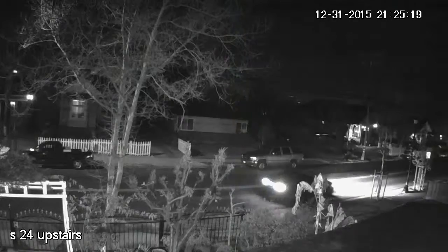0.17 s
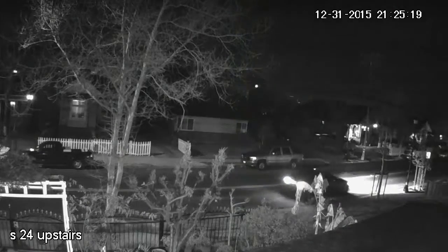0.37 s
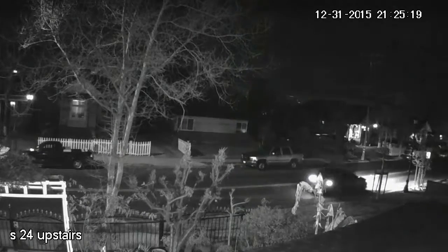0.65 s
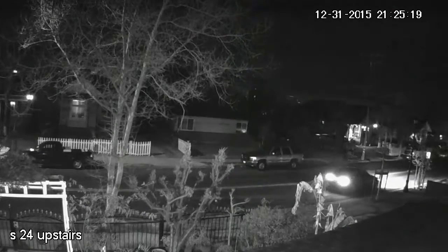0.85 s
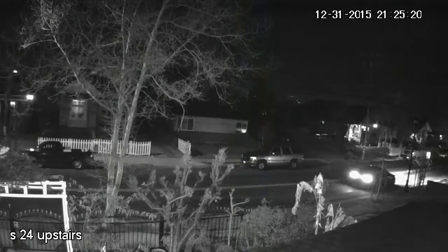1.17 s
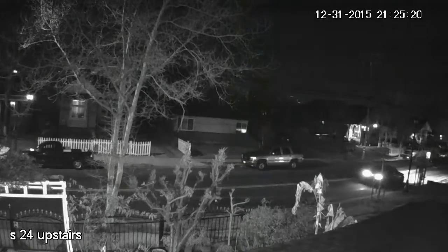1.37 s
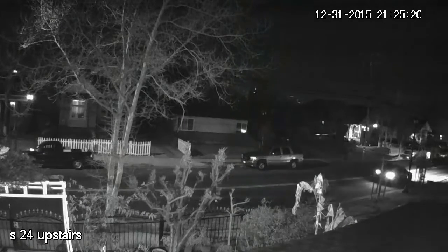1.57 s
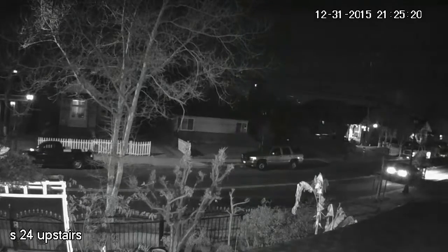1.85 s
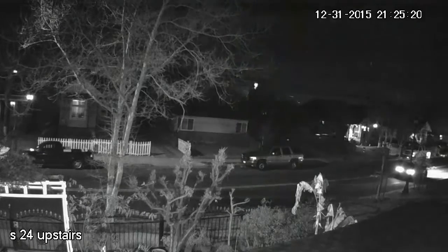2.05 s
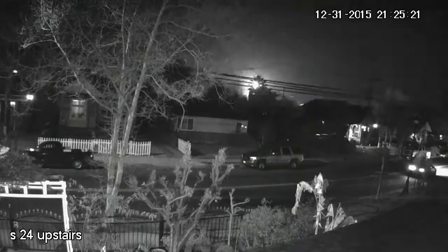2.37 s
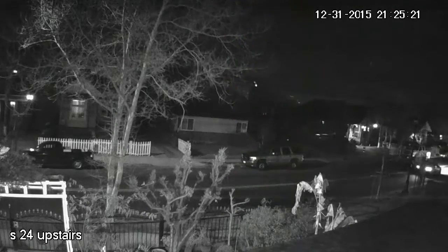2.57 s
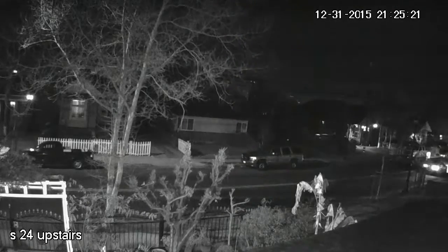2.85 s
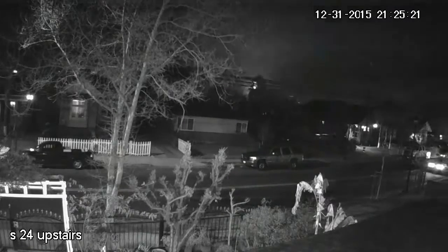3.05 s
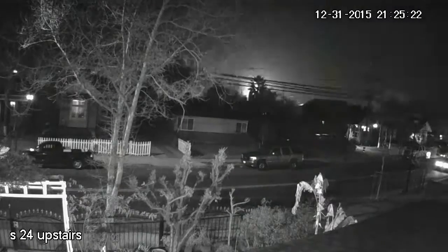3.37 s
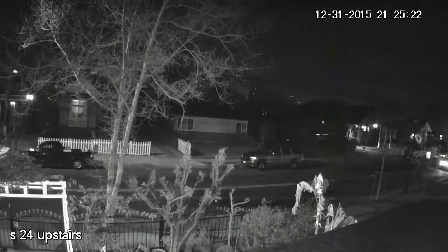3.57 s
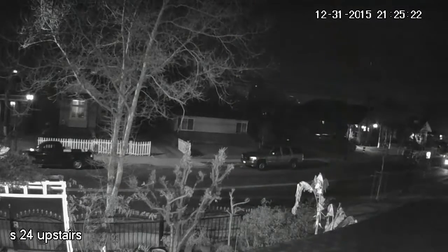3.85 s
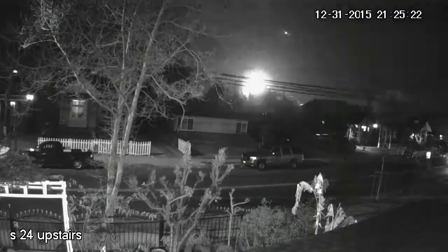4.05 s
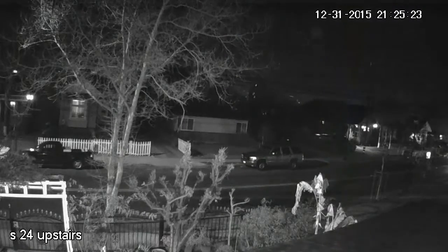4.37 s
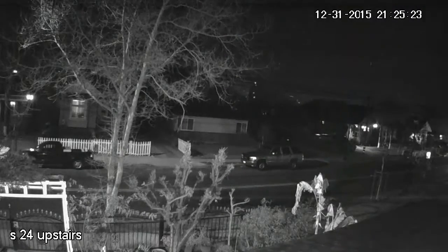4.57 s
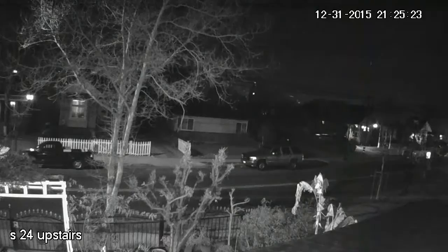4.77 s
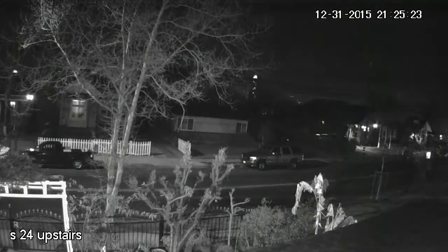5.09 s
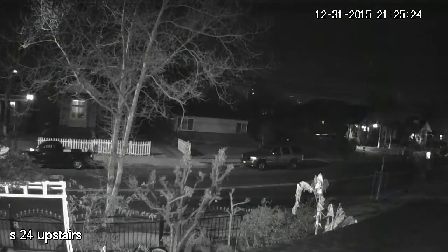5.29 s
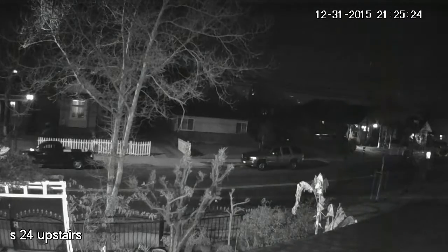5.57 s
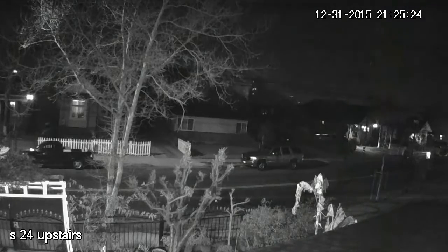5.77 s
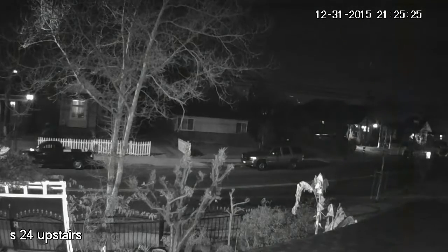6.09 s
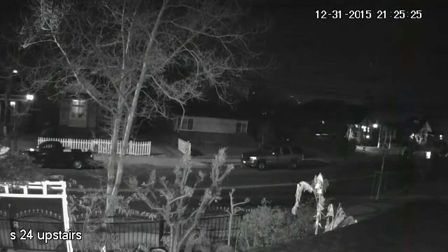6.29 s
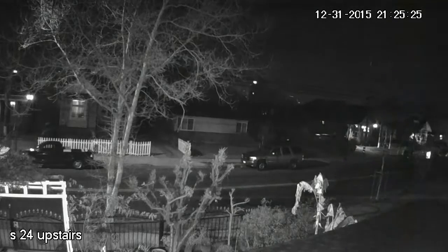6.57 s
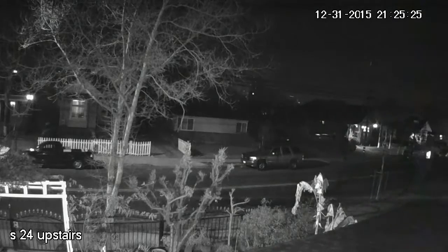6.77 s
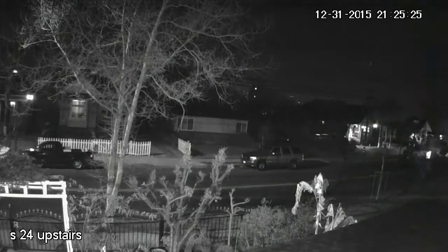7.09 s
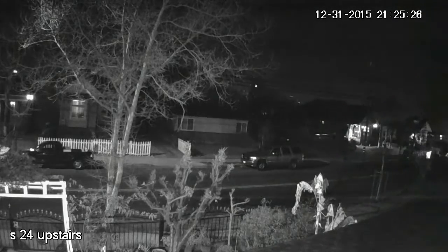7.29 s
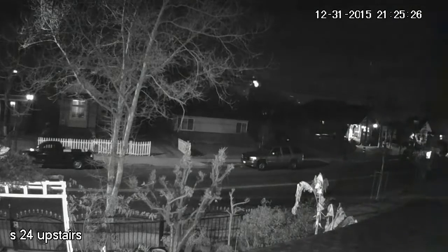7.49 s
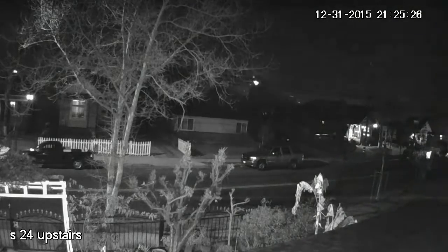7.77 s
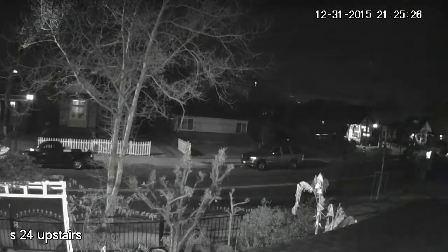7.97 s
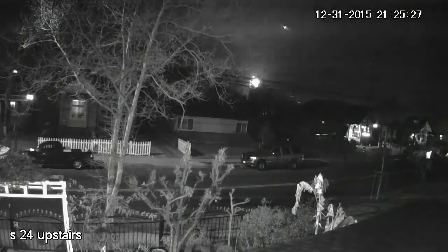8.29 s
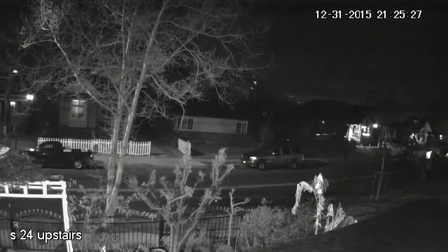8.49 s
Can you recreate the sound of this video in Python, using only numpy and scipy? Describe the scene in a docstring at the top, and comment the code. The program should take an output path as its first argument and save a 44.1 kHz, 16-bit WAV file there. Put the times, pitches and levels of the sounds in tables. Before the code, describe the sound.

Muffled, distorted firework bangs slap off nearby houses in an uneven barrage, after a droning car goes by and fades.

```python
"""Fireworks go off one after another at night, a few houses away. Each shot arrives as a dull thump
over the roofs, then as sharp slaps off the houses and a long rolling echo. Early on, a car passes with
a droning exhaust and hissing tyres and fades down the street. Soft far thuds and the town's low rumble
lie behind. A small, muffled surveillance camera microphone overloads on every bang."""
import sys
import numpy as np
from scipy import signal
from scipy.io import wavfile

SR = 44100
rng = np.random.default_rng(int(sys.argv[2]) if len(sys.argv) > 2 else 0)


def file_out(sig):
    """Save sig as 16-bit WAV at sys.argv[1]."""
    # one column per channel
    cols = np.atleast_2d(sig).T
    # limit, then scale
    lim = np.clip(cols, -1, 1)
    pcm = np.round(lim * 32767).astype(np.int16)
    wavfile.write(sys.argv[1], SR, pcm)


N = 381024


def fireworks(drift_radians_per_s=0.795):
    """All shots travel the same paths, while moving air slowly reshuffles the rolling echo."""
    # Each row: start of a shot in seconds, strength in dB, extra strength of its crack in dB.
    shots = [(0.9785, -1.5, 1), (1.908, -1.5, -1), (3.5878, 0.5, -0.5), (3.6277, -1.5, 1),
             (3.8212, -0.5, 1), (4.0155, -2, 0.5), (4.4011, -3, 0), (4.6644, -1.5, 0.5), (4.8641, -1.5, 0),
             (4.9258, -1.5, -0.5), (5.0098, 0, 0.5), (5.6624, -1, 0), (5.6656, -1, 0), (6.531, 0, 0.5),
             (6.5947, -3.5, 0), (6.6623, 0, 0.5), (7.3758, -0.5, 0), (7.4663, -3.5, 1.5), (8.0647, 0, 0)]
    booms, cracks = np.zeros((2, N))
    for start, db, crack_db in shots:
        add(booms, start, amp([db]))
        add(cracks, start, amp([db + crack_db]))
    air = drift_radians_per_s * np.arange(N) / SR
    out = np.zeros(N)
    for hits, slaps, echo_a, echo_b in zip((booms, cracks), house_slaps(), roll(), roll()):
        out += through(hits, slaps)
        out += through(hits * np.cos(air), echo_a) + through(hits * np.sin(air), echo_b)
    return out


def blast(split_hz=734):
    """A blast in two parts: the low boom bends round things, the high crack needs a clear path."""
    # The tone of the blast. Each row: frequency in Hz, relative level in dB.
    spectrum = [(30, -18.5), (100, -8), (200, -2.5), (330, -2), (470, -4.5), (620, -12.5), (780, -16.5),
                (1500, -8.5), (4000, -27)]
    pulse = pulse_from(spectrum)
    return band(pulse, split_hz, "low"), band(pulse, split_hz, "high", order=3)


def house_slaps(smear_s=.0013, smear_s_per_s=.005, rough_share=0.52, crack_share_db=-12):
    """One shot comes over the roofs, then bounces off each wall. Returns its booms and its cracks."""
    # Loud house fronts. Each row: echo delay in seconds, boom gain in dB, crack gain in dB.
    house_fronts = [(.0238, -5, 8.5), (0.0261, -7.5, 5.5), (.0326, -2, 13.5), (.0352, 3, 8),
                    (.0711, -2.5, -6.5), (.124, -7, -2), (.165, -1.5, -22), (.222, -8.5, 1.5),
                    (.267, -5, -16), (.369, -3, -16), (.389, -3.5, -3.5), (.544, -9, -18.5)]
    boom, crack = (part / abs(part).max() for part in blast())
    t = np.arange(len(boom)) / SR
    booms, cracks = np.zeros((2, 2 * SR))
    add(booms, 0, thump(hz=220, decay_s=.0017, peak_db=5))
    for delay, boom_db, crack_db in house_fronts + lesser_walls():
        # Eaves and porches draw each slap out, more so from far away.
        smear = smear_s + smear_s_per_s * delay
        wall = rough_share * unit(rng.standard_normal(len(t)) * t * np.exp(-2 * t / smear))
        wall[0] += 1  # the clean bounce off the flat face
        add(booms, delay, amp(boom_db) * through(boom, wall))
        add(cracks, delay, amp(crack_db) * through(crack, wall))
    add(booms, .0978, flutter(boom + amp(crack_share_db) * crack, spacing_s=.0022, gain_db=4.0))
    return booms, cracks


def thump(hz, decay_s, peak_db):
    """A pressure wave that lost its treble bending over the roofs: a push, a pull, little more."""
    t = np.arange(SR // 8) / SR
    wave = np.sin(2 * np.pi * hz * t) * (t / decay_s) ** .5 * np.exp(-t / decay_s)
    return amp(peak_db) * wave / abs(wave).max()


def lesser_walls(count=14, from_s=.28, to_s=1.2, base_db=-9, db_per_s=-8, extra_crack_db=-8):
    """Walls at random distances, the farther the weaker. Each row: delay, boom gain, crack gain."""
    delay = from_s + (to_s - from_s) * (np.arange(count) + rng.random(count)) / count
    boom_db = base_db + db_per_s * delay
    return list(zip(delay, boom_db, boom_db + extra_crack_db))


def flutter(pulse, spacing_s, gain_db, widening=.05, count=8):
    """A row of surfaces returns quick echoes, ever wider apart: a short knock that falls in pitch."""
    bounces = np.zeros(SR // 8)
    for k, strength in enumerate(np.hanning(count + 2)[1:-1]):
        add(bounces, k * spacing_s * (1 + widening * k), np.array([strength]))
    return amp(gain_db) * through(bounces, pulse)


def roll(length_s=2.6):
    """The rolling echo of a boom and of a crack: each area around answers, swells and dies away."""
    # Echoing areas, by name. Each row: delay, rise time and time to fade by 60 dB, all in seconds,
    # then boom level and crack level in dB.
    areas = dict(gardens=(0, 0.0272, 1, -15, -40), near_houses=(.022, .033, 1.0, -25, -16.5),
             street=(.078, .03, .2, -9.5, -11.5), next_street=(.14, 0.097, 1.12, -14, -20.5),
             town=(0.22, 0.12, 5.5, -23.5, -29.5))
    t = np.arange(0, length_s, 1 / SR)
    powers = np.zeros((2, len(t)))
    for delay, rise, fade, *levels_db in areas.values():
        swell = np.clip((t - delay) / rise, 0, 1)
        decay = np.exp(-np.log(1000) * np.maximum(t - delay - rise, 0) / fade)
        powers += np.outer(amp(levels_db), swell * decay) ** 2
    return [through(rng.standard_normal(len(t)) * np.sqrt(power), unit(part))
            for power, part in zip(powers, blast())]


def car(exhaust_db=-24.5, second_harmonic_db=-26, third_harmonic_db=-20, tyre_db=-35):
    """A droning car speeds up gently, passes, then eases off as the houses block its sound."""
    # The tone of the tyre noise. Each row: frequency in Hz, relative level in dB.
    tyres = [(40, -5.5), (120, -1.5), (240, 3), (330, -5), (600, -16.5), (1100, -11), (1600, -4.5),
             (4000, -6.5)]
    pass_s, pass_width_s, hidden_from_s, hidden_db_per_s = .65, .8, 1.5, -22
    start_hz, speeding_hz_per_s, easing_hz_per_s = 82.8, 3.8, -7
    swell_peak_s, swell_period_s, wall_share = 0.64, 0.89, 0.36
    t = np.arange(N) / SR
    time_hidden = np.maximum(t - hidden_from_s, 0)
    nearness = amp(hidden_db_per_s * time_hidden) / np.hypot(1, (t - pass_s) / pass_width_s)
    # The drone swells and sinks as its echo off a wall moves in and out of step.
    swell = abs(1 + wall_share * np.exp(2j * np.pi * (t - swell_peak_s) / swell_period_s))
    firing_hz = start_hz + speeding_hz_per_s * (t - time_hidden) + easing_hz_per_s * time_hidden
    phase = 2 * np.pi * np.cumsum(firing_hz) / SR
    overtones = amp(second_harmonic_db) * np.sin(2 * phase) + amp(third_harmonic_db) * np.sin(3 * phase)
    exhaust = np.sqrt(2) * amp(exhaust_db) * swell * (np.sin(phase) + overtones)
    return nearness * (exhaust + amp(tyre_db) * noise(tyres))


def far_thuds(muffle_hz=260):
    """Distance leaves these soft thuds only their bass: a short knock on a longer boom."""
    # Each row: start in seconds, then boom peak and knock peak in dB before muffling.
    thuds = [(.024, -22, -18), (.057, -16, -15), (2.969, -24, -40.5)]
    out = np.zeros(N)
    for start, boom_db, knock_db in thuds:
        add(out, start, thump(hz=88, decay_s=.017, peak_db=boom_db))
        add(out, start, thump(hz=195, decay_s=.0065, peak_db=knock_db))
    return band(out, muffle_hz, "low", order=4)


def town_rumble(level_db=-28.5):
    """The steady low noise of the town at night."""
    # The tone of the rumble. Each row: frequency in Hz, relative level in dB.
    spectrum = [(15, -4.5), (45, -8), (80, -4), (130, -15.5), (250, -14), (500, -25), (1500, -23.5),
                (4000, -39)]
    return amp(level_db) * noise(spectrum)


def amp(db):
    """Turns decibels into a multiplier."""
    return 10 ** (np.asarray(db) / 20)


def unit(x):
    """Scales a sound to an energy of 1."""
    return x / np.sqrt(np.sum(x ** 2) + 1e-20)


def add(mix, start_s, sound):
    """Mixes a sound in at the given time."""
    part = mix[max(round(start_s * SR), 0):][:len(sound)]
    part += sound[:len(part)]


def through(x, response):
    """Sends a sound through an echo or filter (convolution), keeping its length."""
    return signal.oaconvolve(x, response)[:len(x)]


def pulse_from(spectrum, size=8192):
    """A pulse with the given (Hz, dB) rows, its energy as early as possible (minimum phase)."""
    hz, db = np.transpose(spectrum)
    grid_hz = abs(np.fft.fftfreq(size, 1 / SR)) + 1
    log_gain = np.log(amp(np.interp(np.log(grid_hz), np.log(hz), db)))
    return np.fft.ifft(np.exp(np.conj(signal.hilbert(log_gain)))).real[:size // 2]


def band(x, hz, kind, order=2):
    """Keeps the "low" or the "high" side of a frequency."""
    return signal.sosfilt(signal.butter(order, hz, kind, fs=SR, output="sos"), x)


def noise(spectrum):
    """Noise of average power 1, shaped by (Hz, dB) rows."""
    return through(rng.standard_normal(N), unit(pulse_from(spectrum)))


def scene():
    """Fireworks, the car and far thuds over the rumble of the town."""
    return (fireworks() + car() + far_thuds() + town_rumble())[None]


def record(dry, camera_sr=8000, input_limit=.696, output_limit=.707, top_hz=15900):
    """The muffled microphone overloads the camera's coarse converter, which cuts the peaks flat."""
    # The tone of the microphone in its housing. Each row: frequency in Hz, gain in dB.
    microphone = [(10, 2.5), (50, 2), (750, 4), (960, 7.5), (1200, 2), (1480, 5), (1650, -1), (1850, -10),
                  (2100, -22), (3600, -14), (4200, -13.5)]
    muffled = through(dry[0], pulse_from(microphone))
    camera_filter = signal.firwin(15001, camera_sr / 2, window=("kaiser", 9), fs=SR * 80)
    coarse = signal.resample_poly(muffled, camera_sr, SR, window=camera_filter)
    clipped = np.clip(coarse, -input_limit, input_limit)
    smooth = signal.resample_poly(clipped, SR, camera_sr, window=camera_filter)[:N]
    # Peaks between the coarse samples are cut flat again and spit treble.
    harsh = np.clip(smooth, -output_limit, output_limit)
    treble_cut = signal.firwin(511, top_hz, window=("kaiser", 9), fs=SR)
    return signal.oaconvolve(harsh, treble_cut, "same")[None]


dry = scene()
out = record(dry)
file_out(out)
```